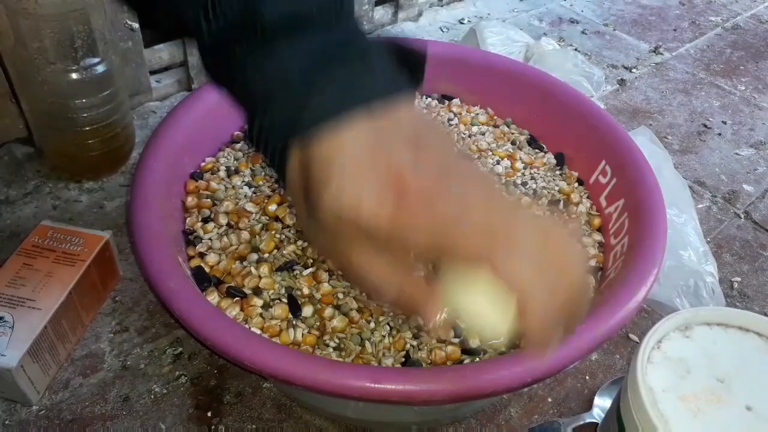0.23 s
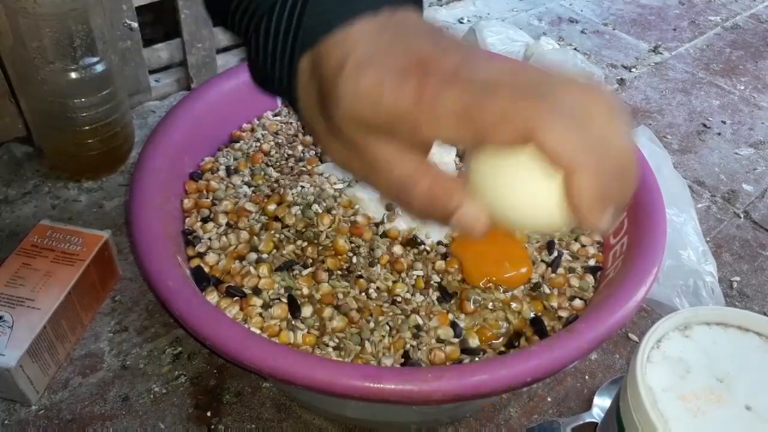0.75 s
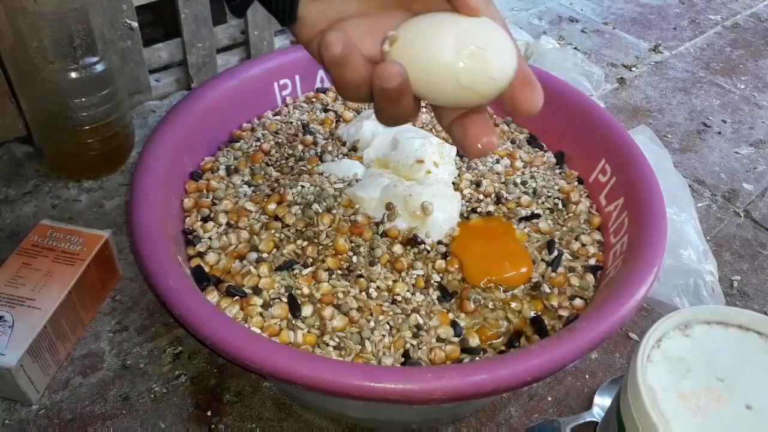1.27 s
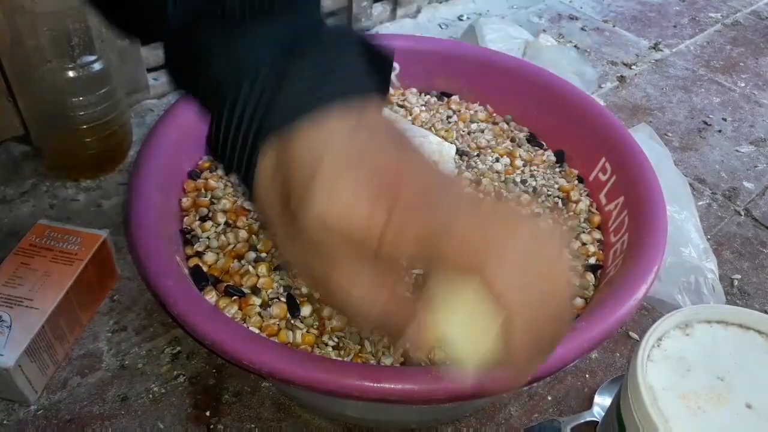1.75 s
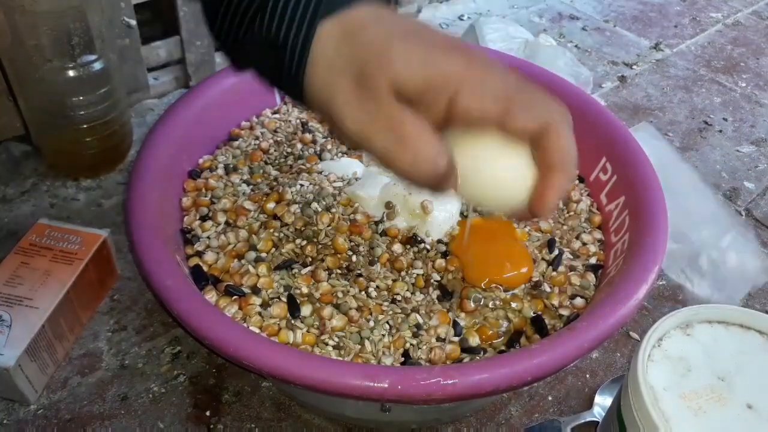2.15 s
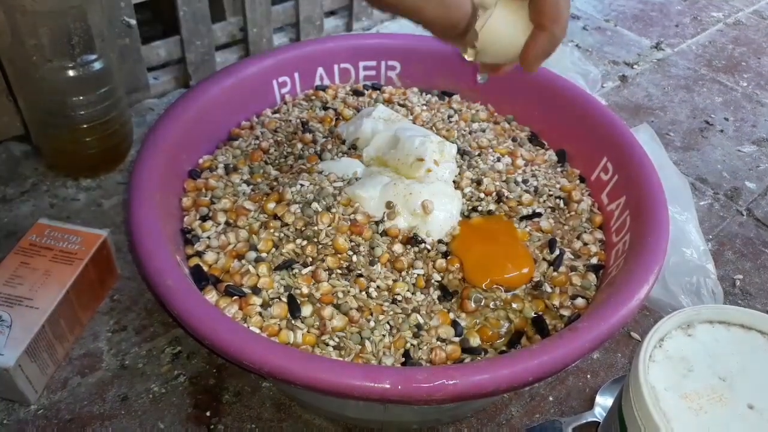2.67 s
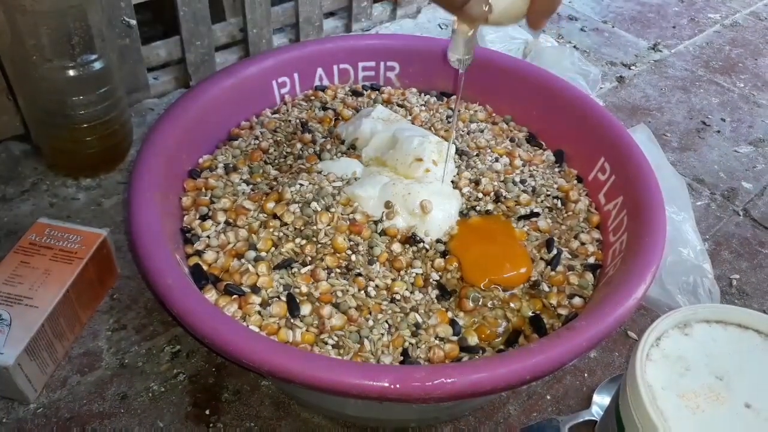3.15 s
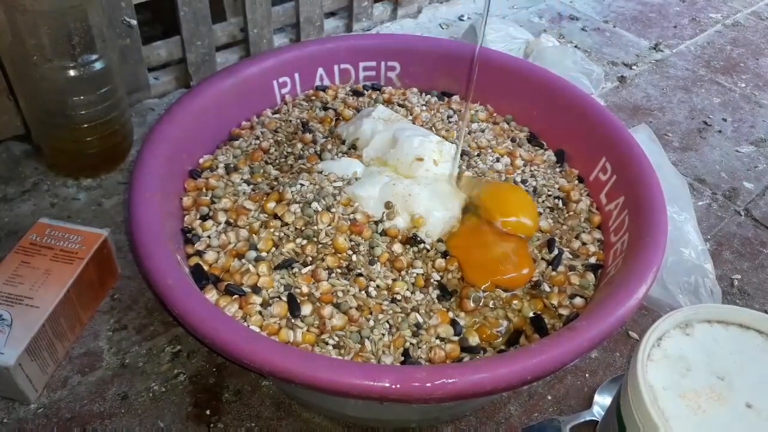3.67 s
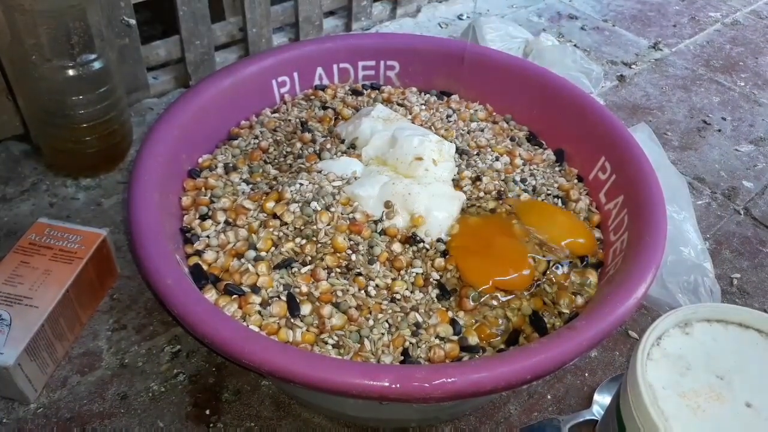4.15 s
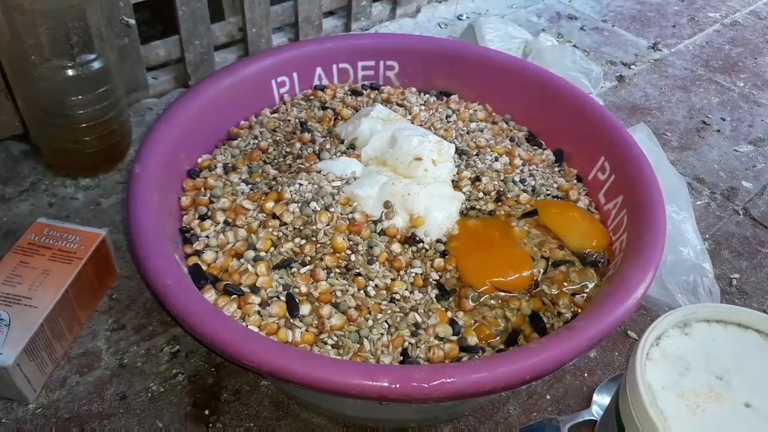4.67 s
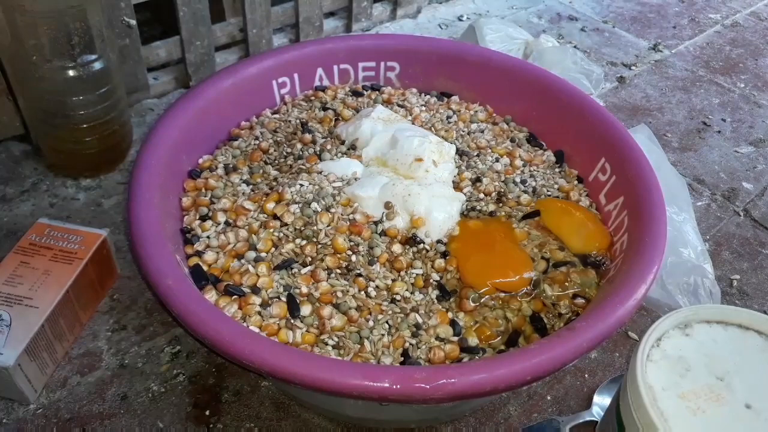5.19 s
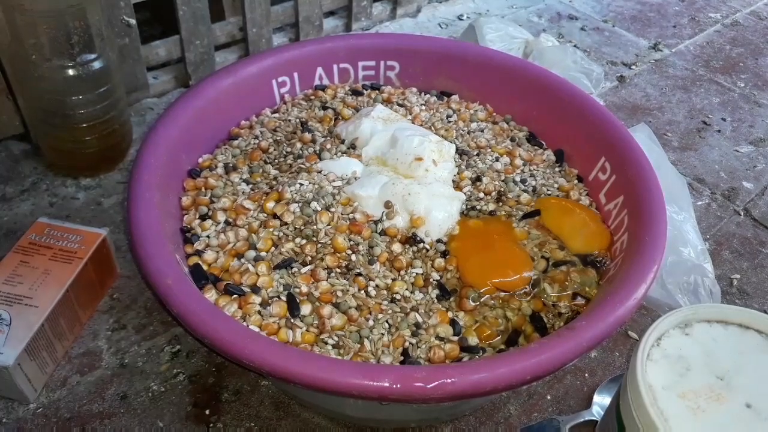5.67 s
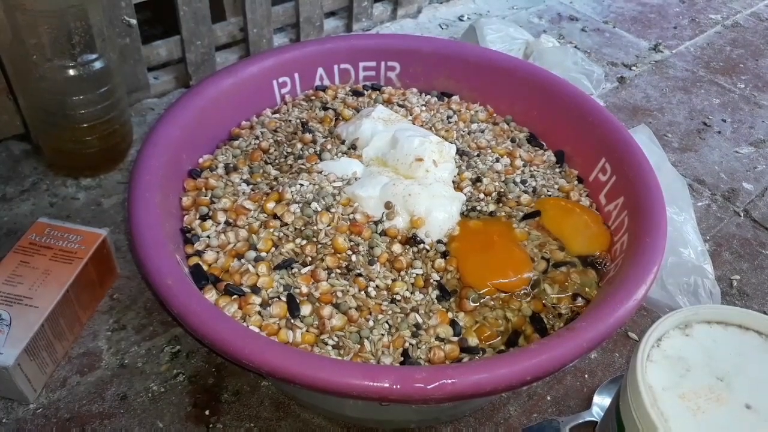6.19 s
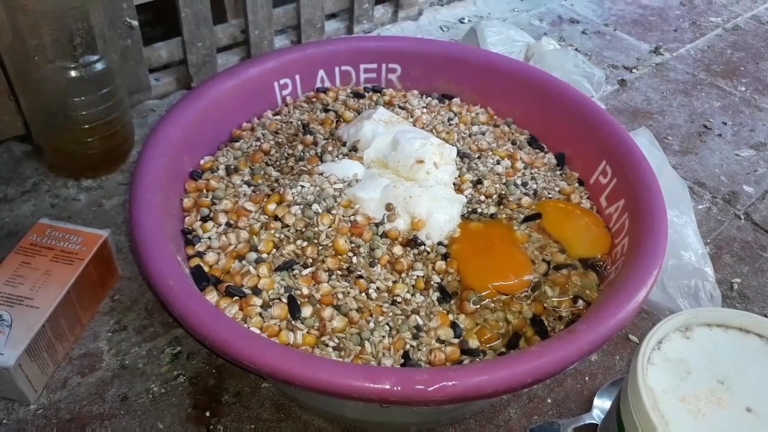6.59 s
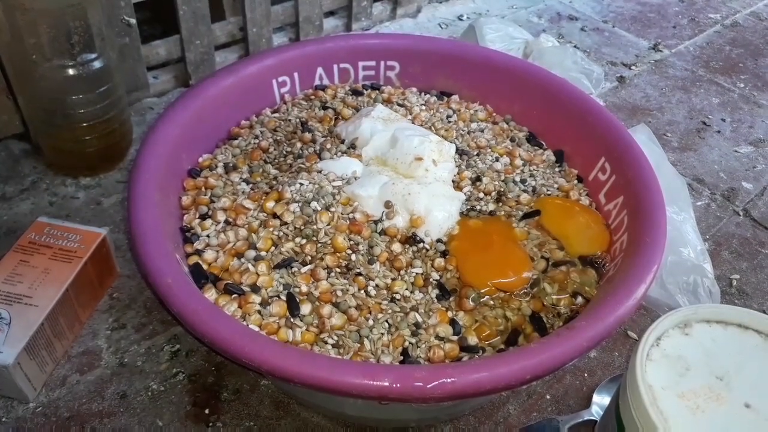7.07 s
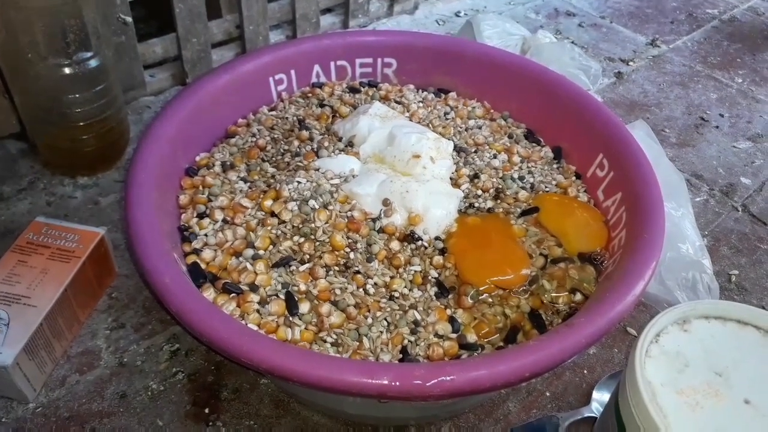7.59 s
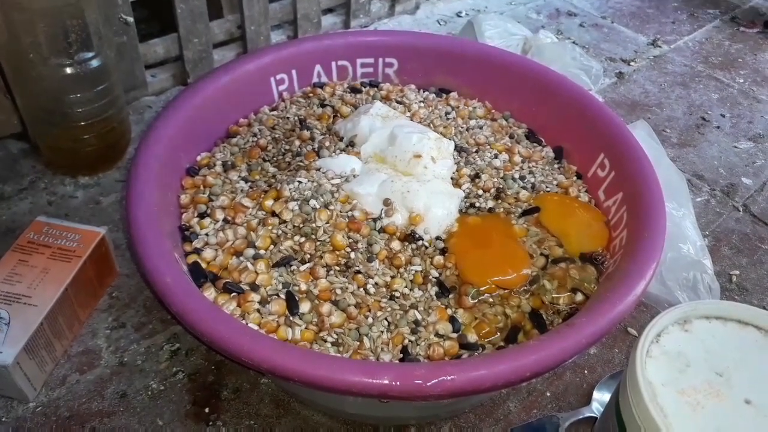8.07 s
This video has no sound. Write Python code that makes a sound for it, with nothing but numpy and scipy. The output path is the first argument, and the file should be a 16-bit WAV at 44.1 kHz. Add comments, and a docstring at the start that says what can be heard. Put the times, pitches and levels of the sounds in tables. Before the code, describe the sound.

In a small, lightly echoing pigeon loft, many birds coo in a fluttering low overlap with short wing puffs, rustling and faint thin whistles from a squab. Close to the microphone an egg knocks on a plastic basin of grain twice early and once near two seconds, then its shell breaks with tiny sharp snaps until about 3.6 seconds. Afterwards only the birds continue, louder and busier.

```python
"""Pigeon loft with an egg being opened

A loft full of pigeons: overlapping throaty coos (fluttered tones), wing beats (puffs of noise) and
a squab's thin begging whistles ring in a small room, each with a decaying noise tail for the walls.
Close to the microphone an egg is knocked three times on the rim of a plastic basin of grain, as
damped modes with a noisy crunch; its shell is pulled open with small sharp snaps, pings plus noise.
Scrapes are resonant noise; the far birds' rustle is coloured noise strewn with faint pecks."""
import sys
import numpy as np
from scipy import signal
from scipy.fft import rfft, irfft, next_fast_len
from scipy.io import wavfile
from scipy.ndimage import uniform_filter1d, map_coordinates

SR = 44100
rng = np.random.default_rng(int(sys.argv[2]) if len(sys.argv) > 2 else 0)


def master(y):
    """Save y as 16-bit WAV."""
    cut = np.clip(np.atleast_2d(y).T, -1, 1)
    pcm = np.round(cut * 32767)  # scale
    wavfile.write(sys.argv[1], SR, pcm.astype(np.int16))


N = 367353

# Activity of the whole loft, which sets the rustle and the far wing beats: time_s, level_db
LOFT_ACTIVITY = [(0.0, -39), (0.65, -42.5), (0.81, -44), (1.41, -46), (1.72, -37.5), (2.48, -40),
                 (2.88, -33.5), (3.25, -41), (3.97, -38), (4.71, -34.5), (5.36, -41.5), (5.66, -37),
                 (6.05, -42), (6.42, -36), (6.61, -42), (7.4, -35.5), (7.82, -40), (8.33, -31.5)]


def near_pigeons():
    """Frequency glide: each coo that stands out of the flock follows a slightly arched pitch."""
    # The nearest coos: start_s, length_s, pitch_hz, glide_semitones, level_db, roughness (0-1)
    coo_notes = [(0.324, .17, 295, -3, -30.5, 0), (.32, 0.13, 390, 0, -33, 0.02),
                 (0.907, 0.11, 277, -3, -34, 0.04), (1.4, 0.23, 455, 1, -32, 0.15),
                 (1.661, 0.23, 272, -2.5, -34, 0.42), (1.849, 0.1, 380, -1.5, -33, 0.05),
                 (1.951, 0.14, 268, 2, -33.5, 0.15), (2.1, 0.25, 505, 0.5, -40.5, 0.93),
                 (2.376, 0.29, 388, 0.5, -35.5, 0.18), (2.532, 0.24, 288, -0.5, -34, 0.4),
                 (2.65, 0.15, 495, -1.5, -35, 0.16), (2.677, 0.27, 352, 0.5, -29.5, 0.52),
                 (2.918, .31, 296, -1, -26.5, 0.22), (2.99, 0.19, 468, -0.5, -24.5, 0.17),
                 (3.161, .2, 466, -2, -21.5, 0.14), (3.233, .18, 280, -1.5, -26.5, 0.33),
                 (3.619, 0.33, 310, 0, -30, 0.93), (3.93, 0.14, 380, -1, -28, 0.08),
                 (4.017, 0.17, 299, -1, -27, 0.56), (4.14, 0.15, 460, -1.5, -31, 0.43),
                 (4.219, 0.2, 356, -1, -24, 0.04), (4.393, 0.14, 304, 0.5, -25.5, 0),
                 (4.64, .14, 464, -0.1, -21, 0.21), (4.711, 0.29, 298, -1.5, -21, 0.17),
                 (4.77, 0.28, 454, 1, -30.5, 0.52), (5.052, 0.25, 383, -0.5, -26.5, 0.05),
                 (5.283, 0.13, 383, 0, -27.5, 0.05), (5.4, 0.36, 315, 1, -29, 0.54),
                 (5.649, 0.12, 453, .5, -25.5, 0.19), (5.741, 0.32, 380, -2.3, -26.5, 0.52),
                 (5.801, .26, 288, -0.5, -28.5, .65), (6.428, .24, 310, -3, -20.5, 0.39),
                 (6.46, .14, 381, -0.6, -26, 0.48), (6.81, 0.12, 460, -1.1, -30.5, .2),
                 (6.97, .12, 434, -4, -29, 0), (7.08, .13, 235, -4.5, -31.5, 0.54),
                 (7.229, 0.086, 394, -1.5, -24, 0.19), (7.279, 0.14, 333, -3, -22, 0.6),
                 (7.493, .17, 385, 0.5, -26.5, 0.01), (7.53, .21, 484, 0, -26.5, 0.24),
                 (7.604, 0.14, 278, -2, -24.5, 0.54), (7.759, 0.22, 311, 0.8, -23, 0.44),
                 (7.852, 0.15, 386, 1, -22.5, 0.01), (7.951, 0.19, 296, 4, -23, 0.48),
                 (8.021, 0.125, 505, 1.6, -30, 0.55), (8.09, .22, 392, -0.8, -25, 0.15)]
    arch_semitones = 0.32  # how far the mean of a coo's two ends lies under its middle
    out = np.zeros(N)
    for start, length, hz, glide, db, rough in coo_notes:
        semitones = np.array([-glide / 2 - arch_semitones, 0, glide / 2 - arch_semitones])
        contour = arch(length, hz * 2 ** (semitones / 12))
        coo = call(contour, rough, trill_hz=32, waver=.07, overtone_db=-32, drift=.004)
        add(out, start, amp(db) * in_loft(coo, wet_db=-11))
    return out


def squab():
    """Amplitude modulation: side tones and a second, higher voice make the soft whistles wheezy."""
    # A young bird's begging whistles, one curve each: time_s, pitch_hz, level_db
    whistle_curves = [
        [(.41, 4520, -48), (.48, 4430, -34), (.56, 4700, -40), (.62, 4220, -41), (.7, 3800, -44)],
        [(1.47, 4150, -56), (1.52, 4120, -44), (1.68, 4020, -41), (1.78, 3780, -51)],
        [(2.45, 4300, -48), (2.53, 4020, -49), (2.65, 4340, -41), (2.79, 4130, -35), (2.88, 4020, -43)],
        [(3.56, 3850, -47), (3.67, 4120, -48), (3.79, 4000, -53)],
        [(4.32, 3850, -44), (4.43, 4520, -38), (4.47, 4190, -31), (4.51, 4230, -35), (4.54, 4520, -32),
         (4.63, 4320, -28.5), (4.69, 4520, -46), (4.85, 4350, -34), (4.95, 4060, -46)],
        [(5.47, 3980, -47), (5.55, 4110, -42), (5.62, 4480, -42.5), (5.67, 4320, -35.5), (5.75, 4300, -36),
         (5.8, 3900, -39), (5.83, 3600, -49)],
        [(7.66, 3900, -46), (7.81, 4390, -48), (7.96, 4110, -46)],
    ]
    roughness, wheeze_depth = 0.453, 0.64  # 0-1; the second is the wheeze of a very soft whistle
    pure_db = -31  # a whistle this loud on its curve keeps half of its wheeze
    upper_share, spacing_hz = 0.44, 617  # second voice: weight in the wheeze, mean distance in pitch
    out = np.zeros(N)
    for curve in whistle_curves:
        s, hz, db = np.transpose(curve)
        t = np.arange(s[0], s[-1], 1 / SR)
        gain = amp(np.interp(t, s, db))
        pitch = np.interp(t, s, hz)
        throat_hz = spacing_hz * (1 + 0.061 * wobble(26, len(t)))
        whistle, upper = [call(f, roughness, trill_hz=70, waver=.02, overtone_db=-21, drift=.01, fade=.1)
                          for f in (pitch, pitch + throat_hz)]
        throat = np.sin(2 * np.pi * np.cumsum(throat_hz) / SR)
        side_tones = whistle * throat + upper_share * upper
        wheeze = wheeze_depth / (1 + (gain / amp(pure_db)) ** 2)
        voice = gain * (whistle + wheeze * side_tones)
        add(out, s[0], amp(-1.0) * in_loft(voice, wet_db=0.5))
    return out


def call(contour, rough, trill_hz, waver, overtone_db, drift, fade=0.48):
    """Joint amplitude and frequency modulation: a rough throat flutters a drifting tone and overtones."""
    n = len(contour)
    trill_rate = trill_hz * (1 + 0.303 * wobble(20.18, n))
    trill = np.sin(2 * np.pi * (np.cumsum(trill_rate) / SR + rng.random()))
    flutter = rough * waver * (wobble(2 * trill_hz, n) + trill)
    hz = contour * (1 + drift * wobble(35.23, n) + flutter)
    phase = 2 * np.pi * np.cumsum(hz) / SR
    overtones = np.sin(2 * phase) + .5 * np.sin(3 * phase)
    tone = (np.sin(phase) + amp(overtone_db) * overtones) * np.exp(1.32 * rough * trill)
    return unit(tone * signal.windows.tukey(n, fade))


def arch(length, pitches):
    """Parabolic pitch contour in Hz through a note's first, middle and last value."""
    n = int(max(length, .04) * SR)
    return np.polyval(np.polyfit([0, .5, 1], pitches, 2), np.linspace(0, 1, n))


def egg_knocks():
    """Modal impact: the egg thumps the rim, whose plastic rings briefly while the shell crunches."""
    # Contacts of egg and rim: start_s, thump_db, ring_db, shell_db, shell_t60_s
    contacts = [(0.1724, -9, -6.5, -10, 0.034), (0.5033, -9, -7.5, -6.5, 0.05),
                (0.5226, -9.5, -13, -22, 0.069), (1.855, -15.5, -11, -6, 0.045),
                (1.869, -32, -24, -31, .04), (1.917, -37, -26, -29, 0.019)]
    # Modes of the basin, damped by its grain: frequency_hz, level_db, t60_s
    basin_modes = [(207.5, -1.5, 0.088), (301, -1.5, 0.074), (372, 1.5, 0.05), (523, -0.5, 0.072),
                   (740, 0.5, 0.048), (797, 3, 0.024), (1010, 4.5, 0.018), (1220, -10, 0.068),
                   (1546, 8, 0.025), (1643, -2.5, 0.016), (1815, -15, 0.043), (1930, -18, 0.045),
                   (2060, 0, 0.022), (2780, -6, 0.03)]
    # Colour of the shell giving way: frequency_hz, level_db
    shell_colour = [(200, -45), (600, -4), (1100, -30), (1600, 9.5), (2400, -6), (3500, -1.5), (5200, 4),
                    (6500, -4.5), (8500, -16), (16000, -28)]
    out, t = np.zeros(N), np.arange(SR // 5) / SR
    for s, thump_db, ring_db, shell_db, shell_t60 in contacts:
        ring = np.zeros(len(t))
        for hz, db, t60 in basin_modes:
            blow_db = thump_db if hz < 650 else ring_db
            strength_db = db + blow_db + rng.normal(0, 1.0)
            ring += amp(strength_db - 60 * t / t60) * np.sin(2 * np.pi * (hz * t + rng.random()))
        grain_db = 3.8 * wobble(1030, len(t))
        crunch = noise(shell_colour, len(t)) * amp(shell_db + grain_db - 60 * t / shell_t60)
        onset = 1 - np.exp(-t / 0.0014)
        add(out, s, in_loft((amp(-6.5) * ring + crunch) * onset, wet_db=-10))
    return out


def shell_snaps():
    """Brittle fracture: bits of shell break with a very short, high ping and a burst of noise."""
    # Snaps: start_s, level_db, pitch_hz
    snap_events = [(1.8713, -9, 5000), (1.918, -16, 5300), (2.3945, -23, 5480), (2.4034, -29, 5600),
                   (2.426, -9.5, 5340), (2.7928, -20, 4680), (2.966, -14.5, 3230), (2.9744, -10.5, 3260),
                   (3.0052, -5, 3870), (3.2968, -11, 3600), (3.3486, -11.5, 3450), (3.645, -20.5, 4800)]
    crack_colour = [(800, -13), (2000, -7.0), (3300, 0), (5500, 1.5), (8000, -17), (15000, -19)]  # Hz, dB
    out, t = np.zeros(N), np.arange(SR // 30) / SR
    for s, db, pitch in snap_events:
        ping = np.sin(2 * np.pi * pitch * t) * amp(-60 * t / 0.015)
        crack = noise(crack_colour, len(t)) * amp(-60 * t / 0.012)
        add(out, s, amp(db) * in_loft(amp(-2) * ping + amp(-5.0) * crack, wet_db=-11.0))
    return out


def wings(count):
    """Turbulent puffs: harder near beats sound brighter; far ones follow the loft's activity."""
    # The nearest beats: start_s, level_db, swish_db (weight of the low band), length_s
    near_beats = [(0.292, -29.5, -3, 0.0083), (.385, -33, -13, 0.041), (0.572, -27.5, -13, .019),
                  (.678, -26.5, -14, 0.025), (.78, -31.5, -13, .04), (0.985, -24.5, -3.5, 0.025),
                  (1.185, -30, -6.5, .017), (1.376, -31.5, -11, 0.015), (1.458, -26.5, -14, 0.0089),
                  (1.692, -25.5, -24, 0.011), (1.782, -25.5, -18, 0.02), (1.974, -32.5, -11, 0.014),
                  (2.118, -28, -10, 0.015), (2.136, -25.5, -13, 0.023), (2.396, -23, -24, 0.01),
                  (2.618, -25.5, -18, 0.03), (2.654, -25, -2, 0.018), (2.851, -21, -10, 0.029),
                  (2.947, -29, -19, .023), (3.026, -30, -10, 0.023), (3.201, -32.5, -1, .035),
                  (3.25, -27.5, -15, 0.042), (3.473, -26.5, -15, 0.016), (3.509, -18, -9.5, 0.017),
                  (3.704, -26, -13, 0.034), (3.903, -24.5, -11.5, 0.013), (3.979, -31, -14, 0.025),
                  (4.081, -16.5, -17, 0.01), (4.238, -16, -3.5, 0.011), (4.329, -18.5, -3.5, 0.0083),
                  (4.458, -21.5, -12, 0.014), (4.688, -16, -12, 0.022), (4.78, -29, -16, 0.022),
                  (4.863, -14, -13, 0.015), (5.01, -16, -17, 0.014), (5.115, -24.5, -8.5, 0.017),
                  (5.204, -27, -12.5, 0.047), (5.419, -18, -19.5, 0.02), (5.589, -23.5, -12, 0.0096),
                  (5.853, -34.5, -11.5, 0.062), (6.036, -22, -16, 0.011), (6.121, -20.5, -19, 0.0046),
                  (6.247, -27.5, -14, 0.018), (6.391, -29, -27, 0.013), (6.525, -30.5, -5, 0.072),
                  (6.775, -18.5, -11, 0.019), (6.954, -19, -20, 0.011), (7.148, -23.5, -15.5, 0.021),
                  (7.205, -27, -11, 0.012), (7.33, -27, -17, 0.032), (7.457, -25, -10, .012),
                  (7.716, -26.5, -1, 0.018), (7.8, -28, -15, 0.016), (7.967, -28.5, -2, 0.032),
                  (8.137, -18, -6, 0.011), (8.238, -31, -3, .02)]
    fizz_db, fizz_growth = -1.5, 0.12  # top-octave tilt; dB more for each dB a beat is harder than usual
    far_db, far_swish_db, far_fizz_db, far_length_s = 8, -14.5, -1, 0.012  # far_db is over the activity
    near, far = np.zeros(N), np.zeros(N)
    usual_db = np.mean([row[1] for row in near_beats])
    for s, db, swish_db, length in near_beats:
        beat_fizz_db = fizz_db + fizz_growth * (db - usual_db)
        add(near, s, amp(db) * wing_beat(swish_db, beat_fizz_db, length))
    # one far beat at a random moment in each of equal time slots
    for slot, (when, size) in enumerate(rng.random((count, 2))):
        beat = wing_beat(far_swish_db, far_fizz_db, far_length_s)
        add(far, (slot + when) / count * N / SR, amp(far_db + 3 * (size - .5)) * beat)
    return near + amp(curves(LOFT_ACTIVITY)[0]) * far


def wing_beat(swish_db, fizz_db, length):
    """Gated broadband noise: a short grainy puff of feather noise, drawn out by the room."""
    # Colour of the feathers: frequency_hz, level_db
    feather_colour = [(410, -15), (700, -5), (875, -7.5), (1840, -4), (2000, -4), (2160, -7), (2660, -4.5),
                      (3030, -4), (5060, 0.5), (6230, -3), (9990, -16.5), (13700, -8), (16000, -19.5)]
    t = np.arange(SR // 6) / SR
    tilt = [(1800, swish_db + 12.5), (3000, 0), (6500, 0.011), (9000, fizz_db)]  # Hz, dB
    colour = [(hz, level + along(tilt, hz)) for hz, level in feather_colour]
    stroke = (1 - np.exp(-t / 0.0004)) * np.exp(-(t / max(length, .003)) ** 2)
    puff = noise(colour, len(t)) * amp(4.07 * wobble(481, len(t))) * stroke
    return amp(-3.5) * in_loft(puff, wet_db=9.0)


def scrapes():
    """Resonant filtering: brief hollow scratches, each noise in one broad resonance."""
    # Scratches among the birds: start_s, level_db (3 dB is added), pitch_hz
    scratches = [(3.515, -28, 2920), (5.064, -31.5, 2000), (5.065, -34.5, 3400), (6.05, -35, 1770),
                 (7.626, -36.5, 1760), (7.965, -36, 1700), (8.01, -37, 995), (8.135, -27.5, 900),
                 (8.245, -31, 840), (8.275, -30, 810)]
    out, t = np.zeros(N), np.arange(SR // 8) / SR
    for s, db, pitch in scratches:
        rasp = unit(filtered(rng.standard_normal(len(t)),
                             lambda hz: 1 / (1 + ((hz - pitch) / (.17 * pitch)) ** 2)))
        stroke = (1 - np.exp(-t / 0.0015)) * np.exp(-t / 0.025)
        add(out, s, amp(db + 3.0) * in_loft(rasp * stroke, wet_db=-21.0))
    return out


def flock():
    """Superposition: deep grunts and low, middle and high voices merge over the loft's dull boom."""
    # The farther birds: time_s, low_voices_db, high_voices_db, rumble_db (offsets are added below)
    flock_levels = [(0.0, -31, -43, -51), (0.39, -30, -38.5, -54), (0.74, -39.5, -46, -58),
                    (1.3, -40.5, -49, -59), (1.74, -34.5, -35.5, -54.5), (2.99, -27.5, -38.5, -55.5),
                    (3.16, -27, -29.5, -52), (3.46, -33, -42, -55), (3.83, -27, -38.5, -58.5),
                    (4.57, -25, -38.5, -42), (4.82, -23, -27, -53), (5.08, -25.5, -43.5, -56.5),
                    (6.05, -25, -34.5, -47.5), (6.4, -24.5, -35.5, -55), (6.82, -26, -32.5, -54),
                    (7.26, -28, -37.5, -52.5), (7.96, -23.5, -32.5, -45), (8.33, -24, -35, -52)]
    # Boom of the loft: frequency_hz, level_db
    boom_colour = [(60, -46), (130, -13.5), (200, -4.5), (270, 2), (400, -2.5), (500, -6), (600, -9.5),
                   (750, -27.5), (1200, -70)]
    # Rumble: frequency_hz, level_db
    rumble_colour = [(20, -34), (48, -17), (75, -8), (140, 2.5), (190, -2), (260, -4), (500, -39)]
    low_db, high_db, rumble_db = curves(flock_levels)
    low = amp(-4) * chorus(283, .06, count=45)
    middle = amp(-5.5) * chorus(383, 0.025, count=36)
    high = chorus(462, .038, count=40)
    boom = amp(-9) * noise(boom_colour, N)
    grunts = amp(-16.0) * chorus(205, .13, count=30)
    rumble = noise(rumble_colour, N)
    warble = amp(low_db + 1.5) * (low + middle + grunts + boom)
    return warble + amp(high_db + 1) * high + amp(rumble_db + 5) * rumble


def chorus(voice_hz, spread, count):
    """Incoherent summation: many far coos overlap around one pitch; their sum has an even level."""
    out = np.zeros(N)
    starts = np.linspace(-.3, N / SR, count)
    for start, a, b, c in np.c_[starts, rng.standard_normal((count, 3))]:
        pitches = voice_hz * np.exp(spread * np.array([a + b, a, a + c - .5]))
        contour = arch(rng.uniform(0.201, 0.454), pitches)
        rough = rng.uniform(0.25, 0.852)
        coo = call(contour, rough, trill_hz=30.08, waver=0.0674, overtone_db=-30.0, drift=0.0098)
        add(out, start + rng.normal(0, .04), in_loft(coo, wet_db=4.0))
    return out / np.sqrt(np.abs(uniform_filter1d(out ** 2, size=8000)) + 1e-9)


def bustle():
    """Modulated noise: feet and feathers of far birds make a restless hiss with faint pecks in it."""
    # Colour of the rustle: frequency_hz, level_db
    rustle_colour = [(350, -13), (600, 2), (779, -2), (1080, -4), (1930, -4.5), (2370, -5.5), (4050, -2),
                     (5190, -2), (5950, -3.5), (10200, -22.5), (13600, -15.5), (16000, -27)]
    activity_db, = curves(LOFT_ACTIVITY)
    hiss = amp(1.4 * wobble(18, N) + 1.8 * wobble(250, N)) * noise(rustle_colour, N)
    pecks, t = np.zeros(N), np.arange(SR // 40) / SR
    for when, size, pitch in rng.random(size=(70, 3)):
        centre_hz = 1500 + 4500 * pitch
        colour = [(0.13 * centre_hz, -18), (centre_hz, 0), (2 * centre_hz, -16), (16000, -24)]
        tick = noise(colour, len(t)) * np.exp(-t / 0.0023)
        add(pecks, when * N / SR, amp(5.4 * size) * in_loft(tick, wet_db=-8.0))
    return amp(activity_db) * (amp(-3) * hiss + amp(3) * pecks)


def in_loft(x, wet_db):
    """Diffuse reverberation: a fresh noise tail decays by frequency; total energy is conserved."""
    # Decay of the loft: frequency_hz, t60_s
    loft_decay = [(200, 0.39), (1500, 0.26), (5000, 0.17), (14000, 0.097)]
    hz, t, z = signal.stft(rng.standard_normal(SR // 3), SR, nperseg=256)
    decay = amp(-60 * t / along(loft_decay, hz)[:, None])
    tail = signal.istft(z * decay, SR, nperseg=256)[1]
    echo = signal.fftconvolve(x, tail)
    y = amp(wet_db) * echo * np.linalg.norm(x) / np.linalg.norm(echo)
    y[:len(x)] += x
    return y * np.linalg.norm(x) / np.linalg.norm(y)


def amp(db):
    """Logarithmic level: decibels to amplitude gain."""
    return 10 ** (np.asarray(db) / 20)


def unit(x):
    """Power normalization: x at rms 1."""
    return x / np.sqrt(np.mean(x ** 2) + 1e-20)


def along(points, hz):
    """Logarithmic frequency scale: (Hz, value) points interpolated on a log axis."""
    f, v = np.transpose(points)
    return np.interp(np.log(hz + 1), np.log(f + 1), v)


def curves(rows):
    """Linear interpolation: one value per sample for each column after the time."""
    s, *cols = np.transpose(rows)
    return [np.interp(np.arange(N) / SR, s, c) for c in cols]


def wobble(rate, size):
    """Band-limited fluctuation: a smooth random curve with rate knots a second."""
    knots = rng.standard_normal(int(size * rate / SR) + 4)
    return map_coordinates(knots, [np.arange(size) * rate / SR + 1])


def filtered(x, gain):
    """Linear filtering: the spectrum of x times a gain that depends on frequency."""
    m = next_fast_len(len(x) + 4096)
    return irfft(rfft(x, m) * gain(np.fft.rfftfreq(m, 1 / SR)), m)[:len(x)]


def noise(spectrum, size):
    """Spectral shaping: noise of rms 1 with the given (Hz, dB) colour."""
    return unit(filtered(rng.standard_normal(size), lambda hz: amp(along(spectrum, hz))))


def add(track, s, x):
    """Superposition: mix x into the track at time s, cut at the track's ends."""
    i = round(s * SR)
    x, i = x[max(-i, 0):], max(i, 0)
    track[i:i + len(x)] += x[:max(len(track) - i, 0)]


def scene():
    """Linear superposition of the birds all around and the egg close by."""
    egg = egg_knocks() + shell_snaps()
    birds = near_pigeons() + squab() + wings(count=28) + flock()
    return (birds + egg + scrapes() + bustle())[None]


def record(dry):
    """Saturation and band limits: the microphone rounds high peaks, thins deep bass and cuts the top."""
    top_hz, low_cut_hz = 16000, 38  # upper band limit; corner of the bass roll-off
    rounded = dry[0] / (1 + np.abs(dry[0] / .85) ** 6) ** (1 / 6)
    return filtered(rounded, lambda hz: (hz < top_hz) * hz / np.hypot(hz, low_cut_hz))[None]


dry = scene()
out = record(dry)
master(out)
```